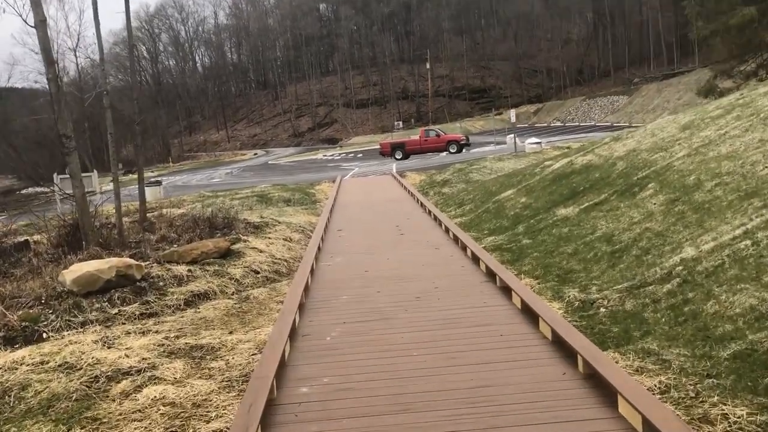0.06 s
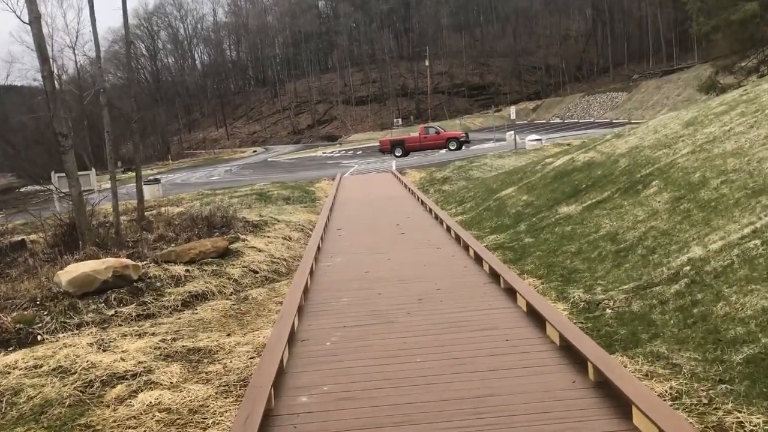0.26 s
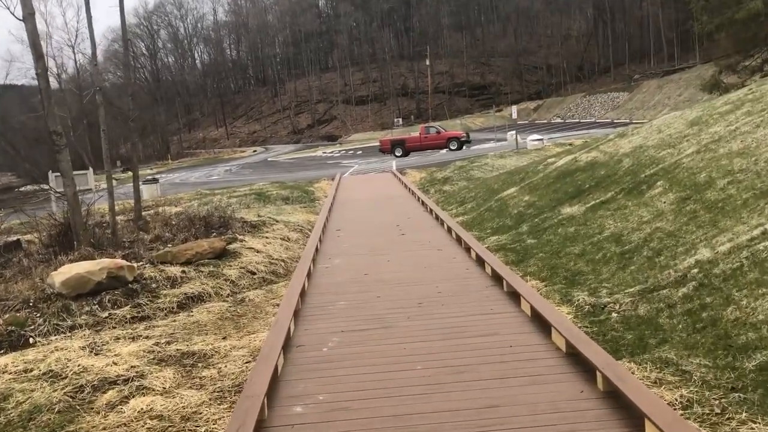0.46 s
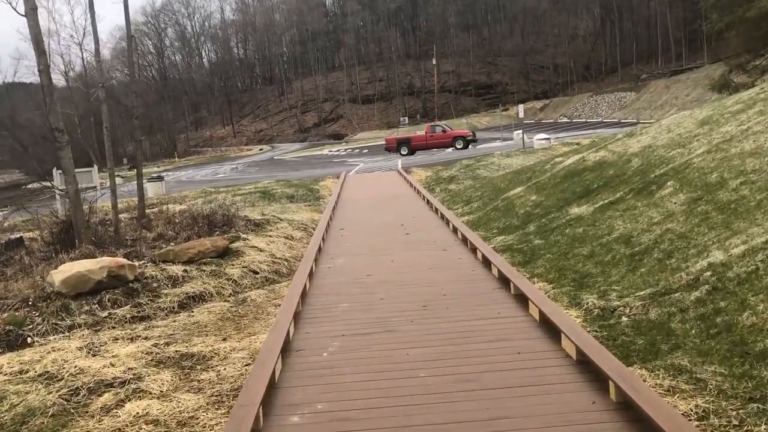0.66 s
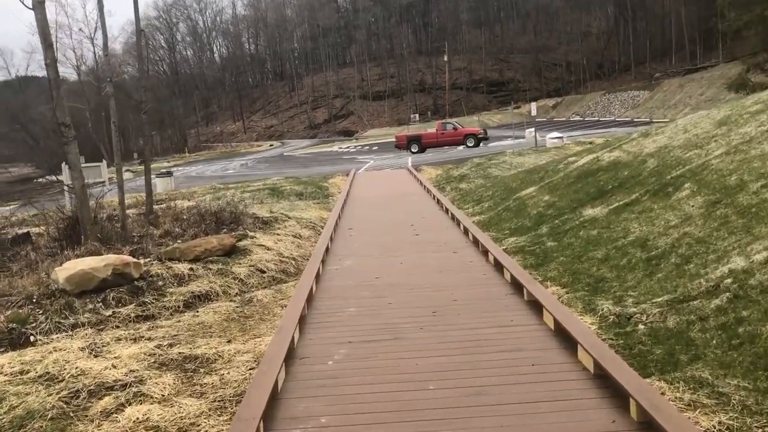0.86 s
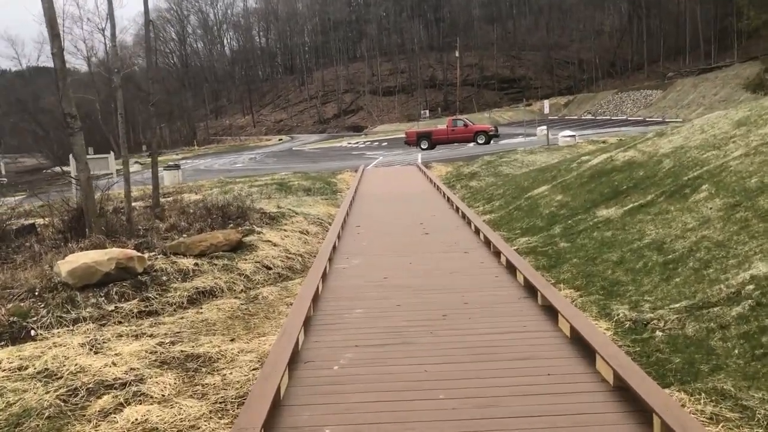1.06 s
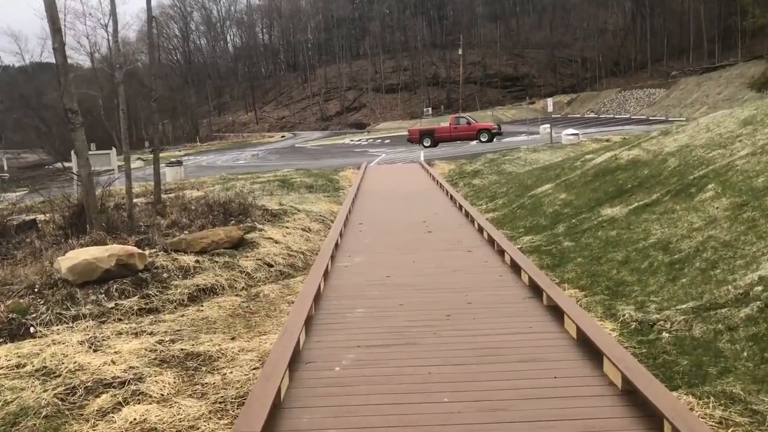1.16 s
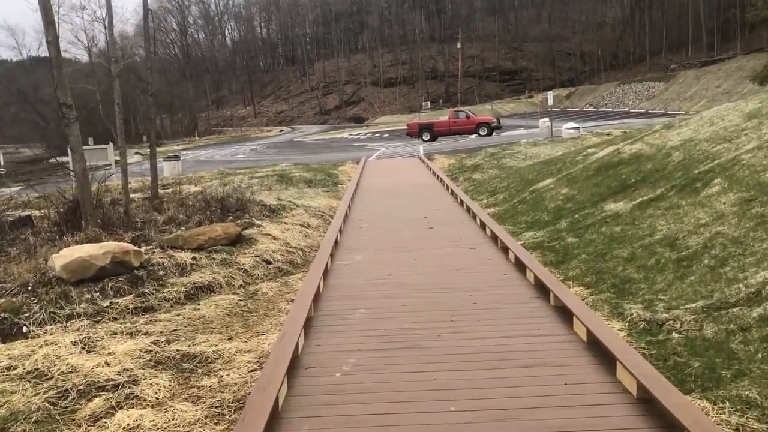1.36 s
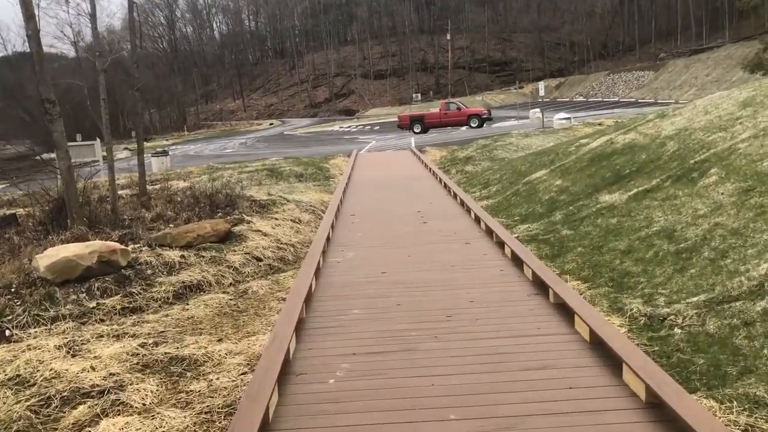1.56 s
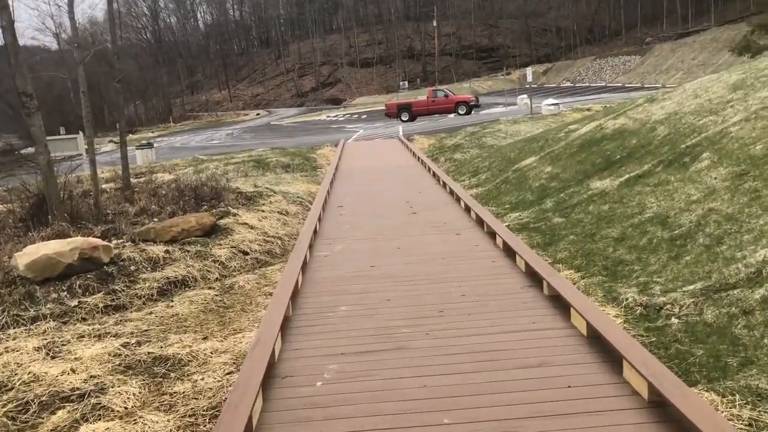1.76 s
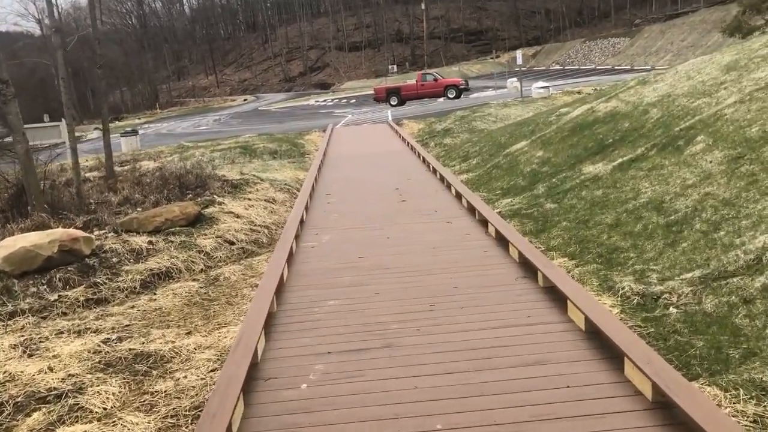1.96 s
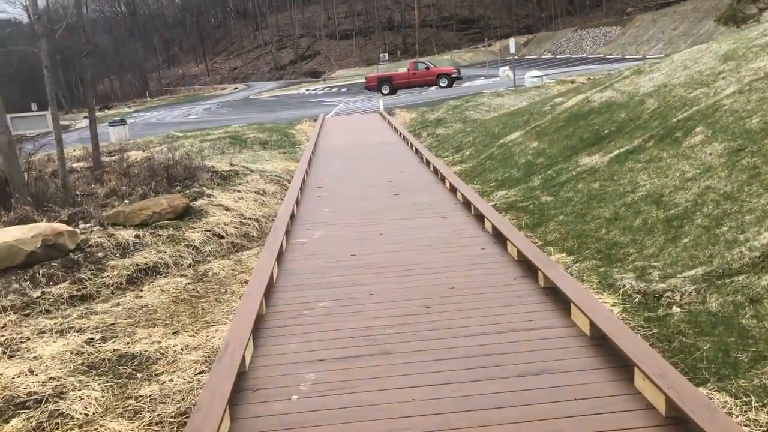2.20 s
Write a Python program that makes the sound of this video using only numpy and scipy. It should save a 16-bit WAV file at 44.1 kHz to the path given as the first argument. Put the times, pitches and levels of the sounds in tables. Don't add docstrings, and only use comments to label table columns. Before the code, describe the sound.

Someone walks along hollow wooden planks, trouser cloth swishing, one heel crushing grit near the end

```python
import sys
import numpy as np
from scipy import signal
from scipy.io import wavfile

SR = 44100
rng = np.random.default_rng(int(sys.argv[2]) if len(sys.argv) > 2 else 0)


def unload_wav(signal):
    wavfile.write(
        sys.argv[1],
        SR,
        np.round(np.clip(np.atleast_2d(signal).T, -1, 1) * 32767).astype(np.int16),
    )


def voltage_ratio(decibels):
    exponent = np.asarray(decibels, float) / 20
    return 10 ** exponent


N = 98387


def rms_one(x):
    return x / np.sqrt(np.mean(x ** 2) + 1e-20)


def drift(rate_hz):
    r = np.exp(-80 * np.pi * rate_hz / SR)
    white = rng.standard_normal(N // 40 + 2002)
    slow = rms_one(signal.lfilter([1], [1, -2 * r, r * r], white)[2000:])
    return np.interp(np.arange(N) / 40, np.arange(len(slow)), slow)


def coloured(white, spectrum, patchy_db):
    out = 0
    edges = 24 * 2 ** np.arange(0, 9.8, .5)
    hz, level = np.transpose(spectrum)
    for k, (low, high) in enumerate(zip(edges, edges[1:])):
        band = signal.sosfilt(signal.butter(2, [low, high], "band", fs=SR, output="sos"), white[k % 2])
        band_db = np.interp(np.log(low * high) / 2, np.log(hz), level)
        out = out + band * voltage_ratio(band_db + patchy_db * drift(15.8))
    return rms_one(out)


def band_split(x, hz, kind):
    return signal.sosfilt(signal.butter(2, hz, kind, fs=SR, output="sos"), x)


def add(out, s, piece):
    i = int(max(s, 0) * SR)
    out[i:i + len(piece)] += piece[:N - i]


# start in seconds, peak level in dB, plank pitch in Hz, t60 in seconds.
PLANK_KNOCKS = [(.002, -33, 193.5, .16), (0.076, -28, 242, 0.023), (.085, -34.5, 294, 0.026),
                (0.098, -36, 246, 0.037), (.132, -45, 174, 0.14), (0.183, -44.5, 125, 0.11),
                (0.366, -52.5, 185, 0.084), (0.594, -46, 140.6, 0.19), (0.621, -41.5, 199, 0.065),
                (0.658, -45, 131, 0.099), (0.73, -51, 162, 0.13), (0.839, -42, 168, 0.06),
                (1.157, -49.5, 218, 0.18), (1.23, -37, 326, 0.03), (1.237, -38.5, 147, 0.1),
                (1.254, -44, 171, 0.12), (1.266, -35, 176.5, 0.077), (1.294, -44, 178, 0.048),
                (1.308, -42, 153.6, 0.13), (1.329, -45.5, 147, 0.22), (1.687, -50.5, 211, 0.13),
                (1.779, -40, 108.6, 0.2), (1.801, -46, 108, 0.13), (1.814, -35, 198, 0.088),
                (1.828, -38, 306, 0.093), (1.851, -40.5, 256.4, 0.19), (1.863, -39.5, 244, 0.075),
                (1.916, -44, 190, 0.16)]
# ratio to the plank pitch, level in dB.
PLANK_MODES = [(1, 1.5), (0.89, -10.5), (1.545, -17), (2.47, -15)]


def knocks():
    contact_s = 0.0012
    out, t = np.zeros(N), np.arange(SR // 3) / SR
    chance = rng.standard_normal((len(PLANK_KNOCKS), len(PLANK_MODES), 2))
    for (s, db, hz, t60), draws in zip(PLANK_KNOCKS, chance):
        ringing = 0
        for (ratio, mode_db), (u, v) in zip(PLANK_MODES, draws):
            varies = ratio != 1
            decay = voltage_ratio(mode_db + 1.1 * u * varies - 60 * t * ratio / t60)
            mode_hz = hz * ratio * (1 + 0.03 * v * varies)
            ringing = ringing + decay * np.sin(2 * np.pi * mode_hz * t)
        add(out, s, voltage_ratio(db) * ringing * (1 - np.exp(-t / contact_s)))
    return out


# start in seconds, level in dB, t60 in seconds.
DECK_FOOTFALLS = [
    (0, -49, 0.57),
    (0.594, -50.5, 1.14),
    (1.233, -49.5, 0.78),
    (1.764, -43, 0.88),
    (2.041, -60.5, 2),
]
# frequency in Hz, level in dB per Hz.
DECK_SPECTRUM = [(60, -20), (110, 3), (170, 0), (280, 0.5), (450, -10.5), (900, -15.5), (2000, -40.5),
                 (4000, -38)]


def deck():
    rise_s, jolts_per_s = 0.0043, 400
    t = np.arange(N) / SR
    shape = 0
    for s, db, t60 in DECK_FOOTFALLS:
        shape = shape + voltage_ratio(db - 60 * np.abs(t - s) / t60) * np.clip((t - s) / rise_s, 0, 1)
    struck = rng.random((2, N)) < jolts_per_s / SR
    jolts = struck * rng.standard_normal((2, N)) + 1e-18
    return shape * coloured(jolts, DECK_SPECTRUM, patchy_db=1.0)


# start in seconds, peak level in dB, final pitch in Hz.
BOARD_TAPS = [(.071, -47, 445), (.119, -45.5, 290), (.148, -45, 300), (.292, -42.5, 298), (.363, -59, 656),
              (.374, -46.5, 542), (.62, -42.5, 365), (.666, -49, 410), (.812, -45, 333), (.998, -40.5, 222),
              (1.02, -44.5, 354), (1.054, -43.5, 327), (1.13, -46, 604), (1.229, -45, 366),
              (1.304, -50, 493), (1.385, -48.5, 494), (1.452, -42.5, 250), (1.567, -49, 624),
              (1.632, -55, 600), (1.659, -48, 683), (1.668, -41, 250), (1.782, -38.5, 850),
              (1.815, -38, 366), (1.868, -52, 440), (1.91, -43.5, 450), (2.05, -39, 285),
              (2.172, -42.5, 390)]


def taps():
    from_hz, fall_s, t60_s, grit_db = 2100, .0015, .028, -10
    out, t = np.zeros(N), np.arange(SR // 16) / SR
    chance = rng.standard_normal(len(BOARD_TAPS))
    grit = signal.lfilter([.3], [1, -.8], rng.standard_normal((len(BOARD_TAPS), len(t))))
    shape = voltage_ratio(-60 * t / t60_s) * (1 - np.exp(-t / 0.0068)) * 3.37
    for (s, db, end_hz), u, noise in zip(BOARD_TAPS, chance, grit):
        start_hz = from_hz * (1 + 0.19 * u)
        hz = end_hz + (start_hz - end_hz) * np.exp(-t / fall_s)
        tone = np.sin(2 * np.pi * np.cumsum(hz) / SR)
        add(out, s, voltage_ratio(db) * shape * (tone + voltage_ratio(grit_db) * noise))
    return out


# start in seconds, peak level in dB, pitch in Hz.
JOIST_BOOMS = [
    (.22, -54, 50),
    (0.599, -53, 50.5),
    (0.7, -48.5, 82),
    (1.368, -46.5, 67.7),
    (1.773, -43, 77),
    (1.929, -46, 73),
    (2.08, -55, 73),
    (2.102, -55, 45),
]


def joists():
    rise_s, t60_s = 0.021, 0.27
    out, t = np.zeros(N), np.arange(SR // 2) / SR
    for s, db, hz in JOIST_BOOMS:
        swell = voltage_ratio(db - 60 * t / t60_s) * (1 - np.exp(-t / rise_s))
        add(out, s, swell * 2 * np.sin(2 * np.pi * hz * t))
    return out


# start in seconds, peak level in dB, pitch in Hz,
# cycles to fall by 60 dB.
SPOT_PINGS = [(0, -35.5, 161, 11), (.033, -38.5, 152, 16), (0.055, -35, 236, 10), (.07, -41, 645, 13),
              (.076, -40, 336, 7.4), (.086, -41.5, 1870, 14), (.118, -47, 990, 18), (.365, -43, 355, 14),
              (.372, -42, 693, 15), (.505, -49, 330, 12), (.596, -49, 830, 16), (.606, -47, 328, 11),
              (0.619, -36, 96, 8), (.621, -48, 650, 14), (.64, -47, 414, 16), (.664, -46, 1010, 14),
              (.685, -50, 480, 12), (0.985, -56, 450, 3.7), (1, -40, 514, 5.4), (1.003, -47, 3350, 22),
              (1.007, -58.1, 5240, 30.1), (1.008, -53, 2700, 20.1), (1.017, -44, 2970, 22),
              (1.018, -49, 5700, 33), (1.304, -44, 4430, 48), (1.306, -48, 3290, 35),
              (1.304, -55, 1280, 14.1), (1.567, -52, 676, 12.1), (1.632, -47, 620, 11),
              (1.645, -51, 900, 10), (1.657, -46, 800, 14), (1.664, -37, 614, 13), (1.765, -35, 895, 5.8),
              (1.7645, -43, 5590, 25.1), (1.769, -26.5, 2930, 25), (1.7682, -37.5, 713, 13),
              (1.769, -46, 910, 11), (1.772, -38, 147, 8), (1.783, -46, 3210, 33), (1.788, -46, 197, 13),
              (1.8, -41, 710, 12), (1.816, -41.5, 1560, 16), (1.868, -42.5, 1150, 16),
              (1.873, -45, 190, 17), (1.881, -38.5, 73, 9.6), (1.912, -45.5, 930, 13),
              (2.053, -57, 1050, 11), (2.174, -43, 730, 17)]


def pings():
    out, t = np.zeros(N), np.arange(SR // 5) / SR
    for s, db, hz, cycles in SPOT_PINGS:
        shape = voltage_ratio(db - 60 * t * hz / cycles) * (1 - np.exp(-t * hz / 0.22))
        add(out, s, shape * np.sin(2 * np.pi * hz * t))
    return out


# start in seconds, length in seconds, level in dB.
GRIT_CRUNCHES = [
    (1.7623, 0.0029, -33),
    (1.7659, 0.0043, -36.5),
    (1.775, 0.0074, -50),
    (1.784, 0.0023, -58),
    (1.798, 0.0037, -73),
    (1.811, .003, -60),
]
# frequency in Hz, width in Hz, level in dB.
GRIT_RESONANCES = [(776, 87, -2), (1500, 570, -12.5), (2190, 300, -5.5), (2930, 340, 0), (3700, 1600, -1.5),
                   (5390, 900, -4), (7150, 600, -9.5), (8980, 1200, -12.5), (12800, 8700, -26)]


def crunch():
    t = np.arange(N) / SR
    shape = 0
    for s, length, db in GRIT_CRUNCHES:
        decay = voltage_ratio(-60 * np.maximum(t - s - length, 0) / 0.013)
        shape = shape + voltage_ratio(db) * np.clip((t - s) / 0.0021, 0, 1) * decay
    cracks = shape * rng.standard_normal(N) * voltage_ratio(2.47 * rng.exponential(1, N)) + 1e-18
    out = 0
    for k, (hz, width_hz, db) in enumerate(GRIT_RESONANCES):
        r = np.exp(-np.pi * width_hz / SR)
        gain = (-1) ** k * voltage_ratio(db) * (1 - r * r) / 2 * np.sqrt(SR / 4 / width_hz)
        poles = [1, -2 * r * np.cos(2 * np.pi * hz / SR), r * r]
        out = out + signal.lfilter([gain, 0, -gain], poles, cracks)
    return voltage_ratio(-6.5) * out


# peak time in seconds, level in dB, length in seconds.
BRIGHT_TICKS = [
    (1.287, -64, .002),
    (1.767, -69, 0.0046),
    (1.8, -62, 0.016),
    (1.819, -61, 0.0024),
    (1.85, -65.5, 0.013),
    (1.934, -62.5, 0.0058),
]


def ticks():
    t = np.arange(N) / SR
    shape = sum(voltage_ratio(db) * np.exp(-((t - s) / length) ** 2) for s, db, length in BRIGHT_TICKS)
    crackle = rng.standard_normal(N) * voltage_ratio(1.8 * rng.exponential(1, N))
    high_pass = signal.butter(4, 8540, "high", fs=SR, output="sos")
    return shape * rms_one(signal.sosfilt(high_pass, crackle))


# peak time in seconds, level in dB, rise in seconds, fall in seconds,
# extra brightness in dB.
CLOTH_SWISHES = [(.09, -66, 0.11, 0.032, 11.5), (.2, -62.5, 0.1, 0.18, -2), (.365, -59.5, 0.03, 0.03, -6),
                 (.52, -65.5, 0.0093, 0.023, -27), (.66, -76, 0.034, 0.13, 17),
                 (0.901, -59, 0.087, 0.081, -33), (1.01, -60.5, 0.026, 0.02, 5.5),
                 (1.127, -60.5, 0.0063, 0.036, 4.5), (1.304, -59.5, 0.0034, 0.0045, -1),
                 (1.349, -64.5, 0.092, 0.043, 11), (1.519, -64.5, 0.044, 0.11, 3),
                 (1.661, -53.5, 0.038, 0.02, -6), (1.791, -63.5, 0.0062, 0.027, 12.5),
                 (1.862, -54, 0.025, 0.013, -15), (1.92, -67, 0.019, 0.079, 6.5),
                 (2.139, -59.5, 0.051, 0.07, -4.5)]
# frequency in Hz, level in dB per Hz.
CLOTH_SPECTRUM = [(290, -75), (500, 14.5), (698, -4), (1060, 1.5), (2460, -4.5), (8930, -19), (15000, -42),
                  (15900, -31)]


def swishes():
    bright_hz = 4270
    t = np.arange(N) / SR
    grainy = rng.standard_normal((2, N)) * voltage_ratio(0.62 * drift(150))
    cloth = coloured(grainy, CLOTH_SPECTRUM, patchy_db=2.0)
    dull_shape, bright_shape = 0, 0
    for s, db, rise, fall, bright_db in CLOTH_SWISHES:
        bump = voltage_ratio(db) * np.exp(-((t - s) / np.where(t < s, rise, fall)) ** 2)
        dull_shape = dull_shape + bump
        bright_shape = bright_shape + bump * voltage_ratio(bright_db)
    dull = band_split(cloth, bright_hz, "low")
    bright = band_split(cloth, bright_hz, "high")
    return dull_shape * dull - bright_shape * bright


# start in seconds, length in seconds, level in dB, start pitch in Hz, end pitch in Hz.
CLOTH_WHISTLES = [(0.093, 0.058, -66, 3390, 3350), (0.322, 0.0089, -60, 1481, 1851),
                  (0.3313, 0.022, -47.5, 1934, 2040), (0.3567, 0.0051, -50, 2130, 2150),
                  (0.362, .0061, -50, 2151, 1490), (0.517, 0.022, -69, 1901, 1560),
                  (0.871, 0.029, -60.5, 2320, 2400), (0.902, 0.044, -62, 1760, 1681),
                  (1.6, 0.025, -58, 1410, 1550), (1.6183, 0.014, -48, 1641, 1945),
                  (1.631, 0.01, -52.5, 2010, 2301), (1.6424, 0.012, -52.5, 1920, 2001),
                  (1.658, .0091, -53.5, 2440, 2401)]


def whistles():
    width_hz, steady, attack_s = 160, 2.2, 0.0012
    out, r = np.zeros(N), np.exp(-np.pi * width_hz / SR)
    white = rng.standard_normal((len(CLOTH_WHISTLES), 2, SR // 5))
    noise = signal.lfilter([1], [1, -2 * r, r * r], white)[:, :, SR // 10:]
    for (s, length, db, from_hz, to_hz), (a, b) in zip(CLOTH_WHISTLES, noise):
        n = int(length * SR)
        phase = 2 * np.pi * np.cumsum(np.linspace(from_hz, to_hz, n)) / SR
        in_phase = (steady + rms_one(a)[:n]) * np.cos(phase)
        rough = rms_one(b)[:n] * (np.sin(phase) + 0.43 * np.cos(2 * phase))
        attack = np.clip(np.arange(n) / SR / attack_s, 0, 1)
        fade = (1 - np.arange(n) / n) ** 0.31
        add(out, s, voltage_ratio(db) * rms_one(in_phase + rough) * attack * fade)
    return out


# frequency in Hz, level in dB per Hz.
AIR_SPECTRUM = [(15, -35), (25, 2), (59, 3), (190, 0.5), (1190, -14), (1480, -12.5), (2750, -18),
                (14700, -30), (15900, -35)]


def open_air():
    air = coloured(rng.standard_normal((2, N)), AIR_SPECTRUM, patchy_db=1.22)
    return voltage_ratio(-57.5 + 0.09 * drift(22.0)) * air


def scene():
    footsteps = knocks() + deck() + taps() + joists() + pings()
    grit = crunch() + ticks()
    trousers = swishes() + whistles()
    return (footsteps + grit + trousers + open_air())[None]


def low_pass(x):
    return signal.sosfilt(signal.butter(12, 15830, fs=SR, output="sos"), x)


def record(dry):
    top = signal.cheby2(16, 60, 16600, fs=SR, output="sos")
    bass = signal.butter(4, 29, "high", fs=SR, output="sos")
    mix = signal.sosfilt(np.vstack([top, bass]), dry)
    return low_pass(mix)


dry = scene()
out = record(dry)
unload_wav(out)
```